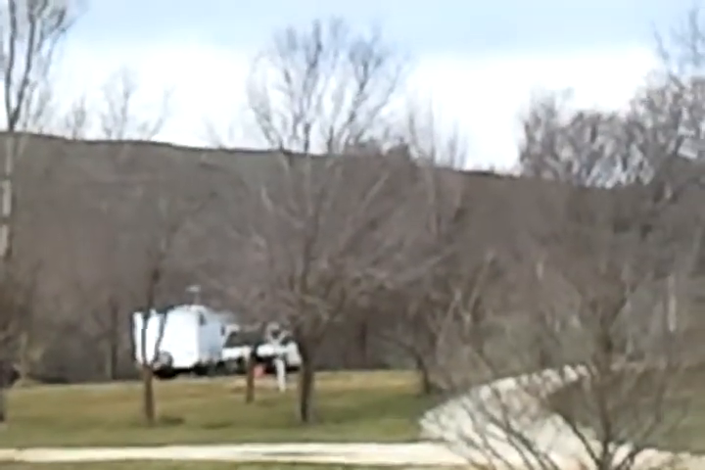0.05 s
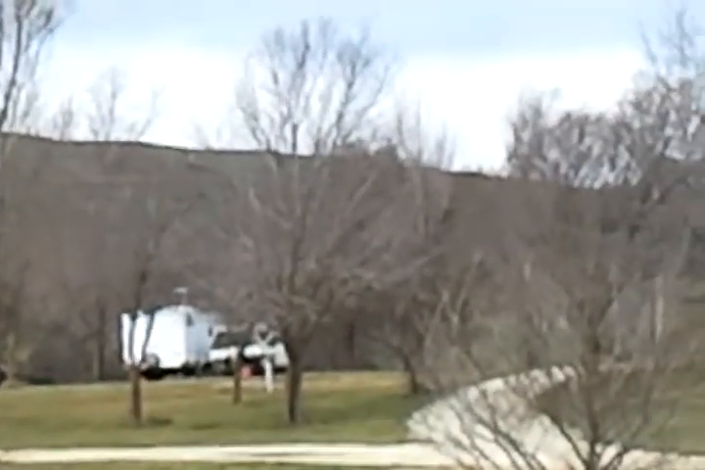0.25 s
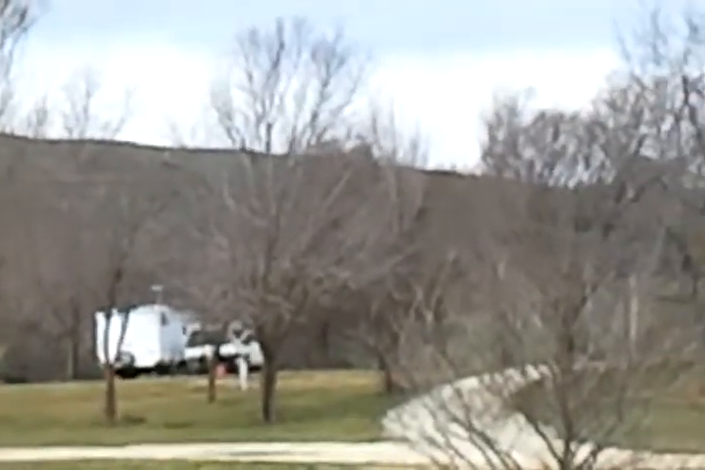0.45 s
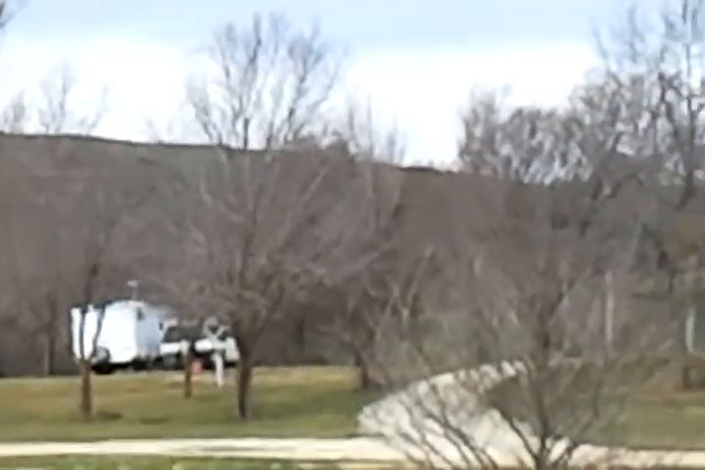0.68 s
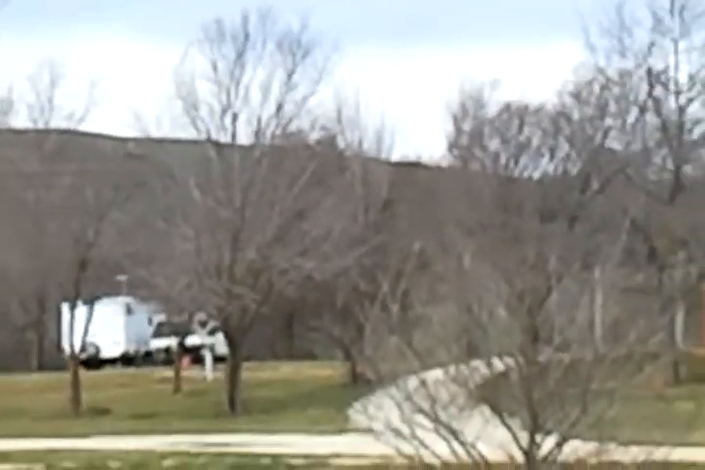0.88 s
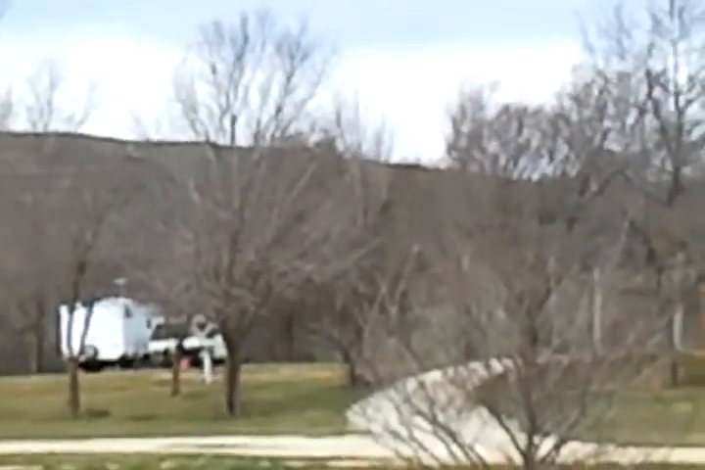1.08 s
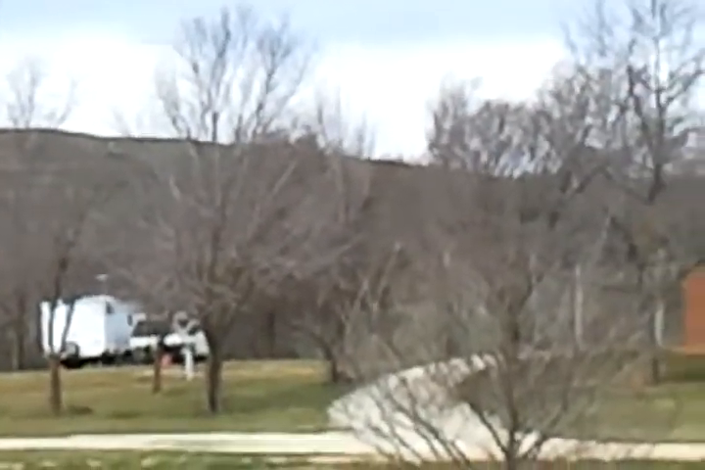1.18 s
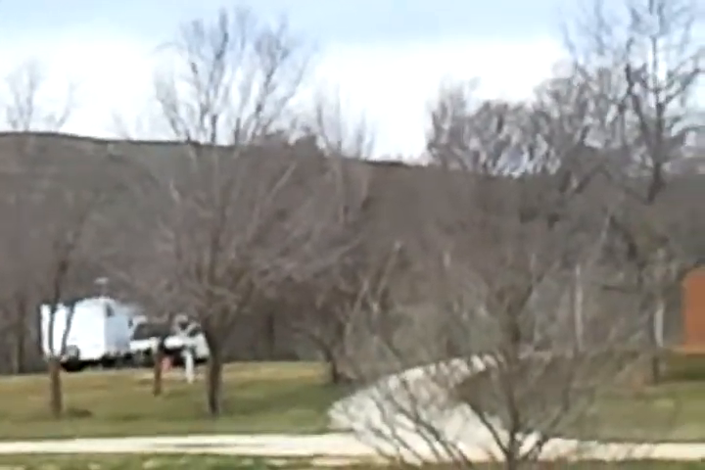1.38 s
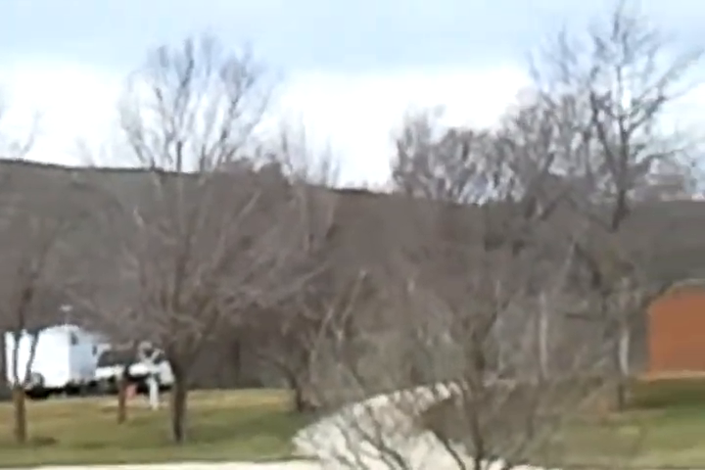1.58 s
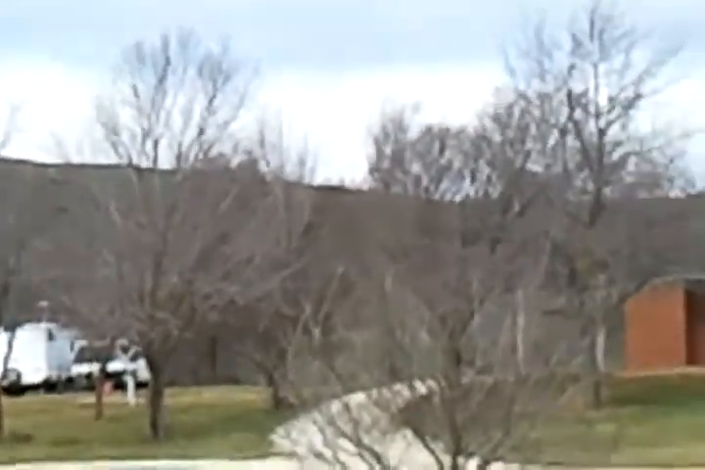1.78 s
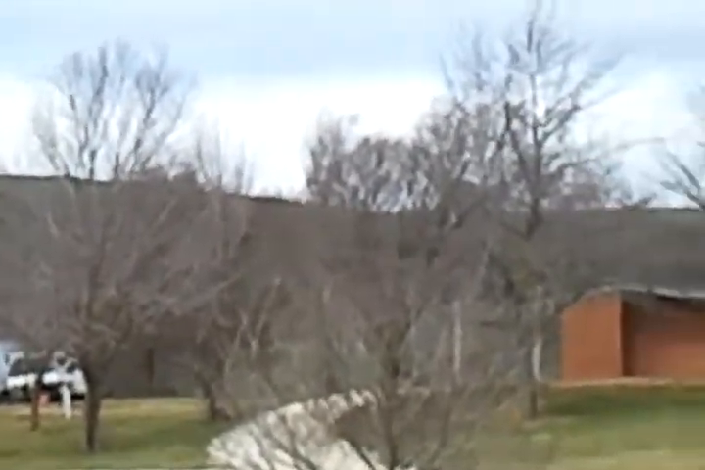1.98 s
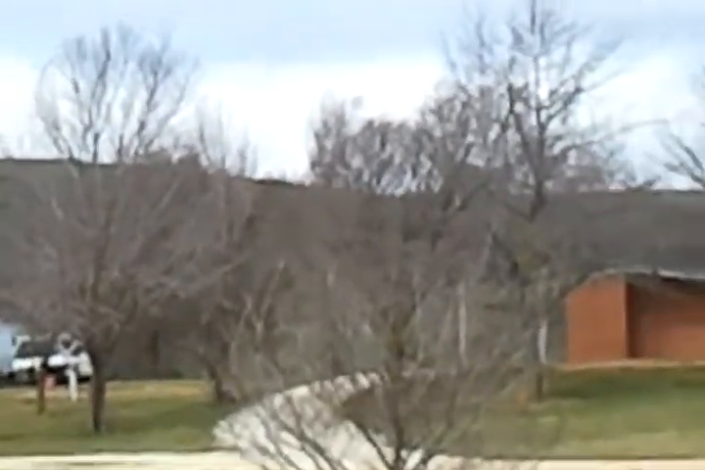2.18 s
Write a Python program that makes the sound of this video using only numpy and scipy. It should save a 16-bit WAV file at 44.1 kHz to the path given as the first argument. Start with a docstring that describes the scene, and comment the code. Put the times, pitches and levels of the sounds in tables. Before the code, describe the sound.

Wind buffets the microphone in open country, building to a cluster of low thumps and overload crackles, then easing into soft rumbling puffs. A few tiny handling ticks sound over a faint, steady outdoor hiss.

```python
"""Wind gusts buffet a camera microphone in open country.
Eddies roll over the port, quicker and brighter as the wind grows; the hardest ones thump
and overload the microphone with a crack. The camera body ticks a few times in the hand.
A far bird peeps, barely audible, over a faint, nearly steady outdoor wash."""
import sys
import numpy as np
from scipy import signal
from scipy.fft import rfft, irfft
from scipy.io import wavfile
from scipy.ndimage import map_coordinates

SR = 44100
rng = np.random.default_rng(int(sys.argv[2]) if len(sys.argv) > 2 else 0)


def persist_wave(psi):
    """Save psi, clipped to +-1, as 16-bit WAV."""
    counts = np.round(np.clip(psi, -1, 1) * 32767).astype(np.int16)
    wavfile.write(sys.argv[1], SR, np.atleast_2d(counts).T)


N = 99225


# Wind strength at the microphone. Each row: time in seconds, relative level in dB.
WIND_STRENGTH = [(0, -33), (.03, -47.5), (.085, -50.5), (.108, -36.5), (.165, -43), (.21, -29.5),
                 (.25, -51), (.28, -50), (.305, -38), (.335, -45.5), (.358, -39), (.38, -50), (.45, -47),
                 (.51, -30.5), (.55, -36), (.58, -25.5), (.62, -27.5), (.66, -23.5), (.69, -32),
                 (.73, -23.5), (.77, -33), (.81, -31), (.855, -40), (.885, -36.5), (.92, -23), (.97, -33.5),
                 (1.01, -24.5), (1.04, -36), (1.08, -29), (1.14, -40), (1.19, -47), (1.24, -41.5),
                 (1.29, -46), (1.33, -57), (1.43, -55.5), (1.52, -46.5), (1.6, -36.5), (1.67, -45.5),
                 (1.74, -40.5), (1.83, -44.5), (1.9, -40.5), (1.95, -46), (2.02, -50), (2.12, -40.5),
                 (2.18, -46), (2.25, -54)]
# Turbulence at the reference strength. Each row: frequency in Hz, relative density in dB.
EDDY_SPECTRUM = [(20, -1.5), (70, -1.5), (150, 3), (260, -3.5), (400, -9), (600, -25), (900, -26.5),
                 (1400, -62.5), (2500, -92)]

def wind():
    """A frozen pattern of eddies is carried past the port: more wind is both louder and faster."""
    reference_db, db_per_octave, port_cutoff_hz = -27.5, 34, 65
    puffs_db = 2.5 * np.tanh(drift(span_s=0.01225))
    strength_db = np.interp(np.arange(N) / SR, *np.transpose(WIND_STRENGTH)) + puffs_db
    speed = 2 ** ((strength_db - reference_db) / db_per_octave)
    eddies = noise(EDDY_SPECTRUM, size=2 * N)
    pressure = map_coordinates(eddies, [np.cumsum(speed)], order=3, mode="wrap")
    pressure = highpass(pressure, port_cutoff_hz)
    local_power = smooth(pressure ** 2, span_s=0.067) + 1e-9
    evened = unit_rms(pressure / local_power ** 0.3)  # partly levels successive eddies
    return evened * amp(strength_db + 2)


# Hard eddies hitting the port. Each row: centre time in seconds, envelope peak in dB,
# centre frequency in Hz, spin from 0 to 1 (more spin, more swings).
HARD_EDDIES = [(0.146, -28.5, 280, 0.75), (0.18, -23.5, 204, .4), (0.2012, -23.5, 237, 0.95),
               (0.2155, -17, 270, .6), (0.3069, -6.5, 291.6, 0.65), (0.3143, -16, 450, 0.53),
               (0.3489, -18, 270, 0.51), (0.5002, -18.5, 274, 0.42), (0.519, -20, 226, 0.63),
               (.5235, -22, 480, 0.67), (.565, -22.5, 300, 0.88), (0.5764, -7, 330, 0.52),
               (.5852, -18, 540, 0.52), (.594, -17, 402, 0.31), (.602, -6, 430, 0.32),
               (.6091, -22.5, 250, 0.17), (0.6345, -15, 283, 0.57), (0.6453, -15, 430, 0.78),
               (0.6554, -6, 435, 0.38), (0.6643, -11, 420, 0.67), (0.6719, -6.5, 560, 0.41),
               (0.7149, -6, 289.5, 0.18), (0.7171, -6.5, 391, 0.15), (0.7279, -10, 513, 0.5),
               (.735, -9, 340, 0.17), (0.74, -8, 269, .45), (0.8, -12, 326, 0.44), (0.8738, -18, 308, 0.64),
               (0.8911, -10.5, 233, 0.26), (0.9065, -8.5, 272, 0.28), (0.9242, -14, 413, 0.4),
               (0.937, -11.5, 327, 0.36), (0.9467, -17, 279, 0.29), (0.9937, -17.5, 200, 0.85),
               (1.0069, -11, 317.5, 0.11), (1.0137, -22.5, 348, 0.64), (1.0216, -6.5, 259, 0.46),
               (1.0793, -19, 360, 0.58), (1.1109, -18, 190, 0.46), (1.1624, -26, 153, 0.39),
               (1.231, -27.5, 216, 0.3), (1.2826, -33, 157, 0.69), (1.5371, -29.5, 180, 0.25),
               (1.5737, -22, 333, 0.57), (1.5921, -25, 194, 0.17), (1.602, -24, 244, 0.53),
               (1.7094, -28, 140, 0.26), (1.7369, -24.5, 191, 0.23), (1.792, -27, 180, 0.7),
               (2.057, -34.5, 220, 0.78), (2.1396, -30.5, 189, 0.36)]

def buffets():
    """A spinning eddy sweeps by as a few quick pressure swings, with a weaker one in its wake."""
    falloff_power, wake_db, mean_lag_cycles = 1.524, -10.5, 1.393
    out = np.zeros(N)
    t = np.arange(-SR // 30, SR // 30) / SR
    for centre_s, db, hz, spin in HARD_EDDIES:
        phase_turns, wake_turns, lag_draw = rng.random(3)
        spin = min(spin, 0.9)
        passing_s = (falloff_power - 0.5) / (2 * np.pi * hz * (1 - spin))
        pulse = amp(db) * np.hanning(len(t)) / (1 - 1j * t / passing_s) ** falloff_power
        swing = pulse * np.exp(2j * np.pi * spin * hz * t)
        eddy = (swing * np.exp(2j * np.pi * phase_turns)).real
        wake = (swing * np.exp(2j * np.pi * wake_turns)).real
        lag_s = mean_lag_cycles * (0.5 + lag_draw) / hz
        add_centred(out, centre_s, eddy)
        add_centred(out, centre_s + lag_s, amp(wake_db) * wake)
    return out


# Microphone overloads. Each row: centre time in seconds, gain in dB.
OVERLOADS = [(.307, -21), (0.5765, -24), (0.6013, -15.5), (0.6106, -29), (.6617, -39.5), (.672, -51),
             (0.7164, -17.5), (0.7174, -15.5), (0.72, -27), (0.7275, -17.5), (0.739, -17), (0.8912, -22.5),
             (.9077, -24), (0.913, -34), (0.993, -31.5), (1.0059, -21), (1.024, -27)]

def overload_cracks():
    """Overload in the hardest buffets bends the wave sharply; each bend is an added kink."""
    decay_s, low_hz, high_hz = 0.00014, 564, 4700
    out = np.zeros(N)
    t = np.arange(-SR // 100, SR // 100) / SR
    kink = highpass(np.exp(-abs(t) / decay_s), low_hz)
    kink = signal.lfilter(*signal.butter(2, high_hz, fs=SR), kink)
    for centre_s, db in OVERLOADS:
        add_centred(out, centre_s, amp(db) * kink)
    return out


# Handling ticks. Each row: centre time in seconds, level in dB, centre frequency in Hz.
BODY_TICKS = [(0.812, -38.5, 6000), (.927, -34.5, 5050), (1.2823, -49.5, 5760), (1.48, -40.5, 4350)]

def body_ticks():
    """The camera body clicks in the hand: tiny, dry bursts of band-limited noise."""
    decay_s, width_octaves = 0.00059, 0.8
    out = np.zeros(N)
    t = np.arange(-512, 512) / SR
    bins_hz = np.fft.rfftfreq(len(t), 1 / SR) + 1
    for centre_s, db, hz in BODY_TICKS:
        burst = rng.standard_normal(len(t)) * np.exp(-abs(t) / decay_s)
        band = np.exp(-0.5 * (np.log2(bins_hz / hz) / width_octaves) ** 2)
        click = irfft(rfft(burst) * band)
        add_centred(out, centre_s, amp(db) * click / abs(click).max())
    return out


# Bird peeps. Each row: centre time in seconds, length in seconds, pitch in Hz, peak in dB.
BIRD_PEEPS = [(0.915, 0.058, 5380, -65.5), (0.969, .04, 5560, -61.5), (2.052, 0.082, 2630, -60.5)]

def bird():
    """A far bird whistles thin, soft-edged, wavering notes."""
    out = np.zeros(N)
    waver_hz = 45 * drift(span_s=0.002)
    for centre_s, length_s, hz, db in BIRD_PEEPS:
        envelope = amp(db) * np.hanning(round(length_s * SR))
        pitch_hz = hz + waver_hz[round(centre_s * SR):][:len(envelope)]
        add_centred(out, centre_s, envelope * np.sin(2 * np.pi * np.cumsum(pitch_hz) / SR))
    return out


# Distant wash and hiss. Each row: frequency in Hz, relative density in dB.
WASH_SPECTRUM = [(20, -37), (60, 2.5), (160, -1.5), (400, -4.5), (750, -2), (1100, -5), (1480, -6),
                 (1700, -14), (3000, -17), (5300, -19), (6700, -23.5), (7500, -29.5)]

def outdoor_wash():
    """Faint open-air noise whose level flickers slightly."""
    level_db = -52.5 + 1.18 * drift(span_s=0.06)
    return noise(WASH_SPECTRUM, size=N) * amp(level_db)


def amp(db):
    """Decibels to gain."""
    return 10 ** (np.asarray(db) / 20)


def unit_rms(x):
    """Scales to rms 1."""
    return x / np.sqrt(np.mean(x ** 2) + 1e-20)


def noise(spectrum, size):
    """Unit-rms noise shaped by (Hz, dB) rows."""
    hz, db = np.transpose(spectrum)
    bins_hz = np.fft.rfftfreq(size, 1 / SR) + 1
    gain = amp(np.interp(np.log(bins_hz), np.log(hz), db))
    return unit_rms(irfft(rfft(rng.standard_normal(size)) * gain, size))


def smooth(x, span_s):
    """Hann-weighted average over span_s to each side."""
    window = np.hanning(int(span_s * SR) * 2 + 1)
    return signal.fftconvolve(x, window / window.sum(), "same")


def drift(span_s):
    """Smooth random curve, rms 1."""
    return unit_rms(smooth(rng.standard_normal(N), span_s))


def highpass(x, hz):
    """Second-order bass cut."""
    return signal.sosfilt(signal.butter(2, hz, "high", fs=SR, output="sos"), x)


def add_centred(mix, centre_s, sound):
    """Mixes a sound in around centre_s."""
    start = max(round(centre_s * SR) - len(sound) // 2, 0)
    part = mix[start:start + len(sound)]
    part += sound[:len(part)]


def scene():
    """All sources at one microphone."""
    return (wind() + buffets() + overload_cracks() + body_ticks() + bird() + outdoor_wash())[None]


def record(dry):
    """The camera's band limit."""
    cutoff_hz = 7500
    taps = signal.firwin(101, cutoff_hz, window=("kaiser", 8), fs=SR)
    return signal.oaconvolve(dry, taps[None], "same")


dry = scene()
out = record(dry)
persist_wave(out)
```